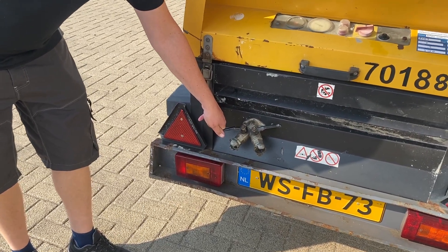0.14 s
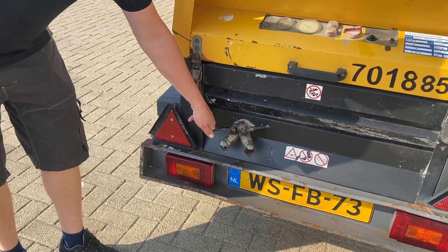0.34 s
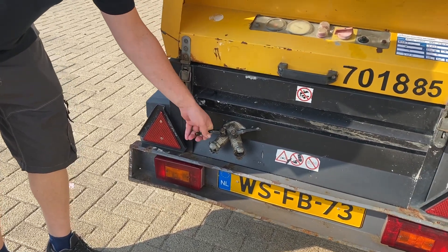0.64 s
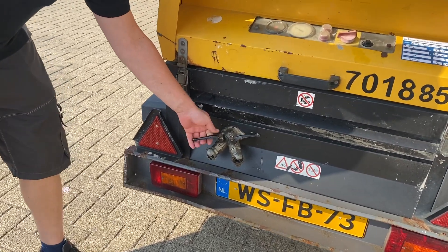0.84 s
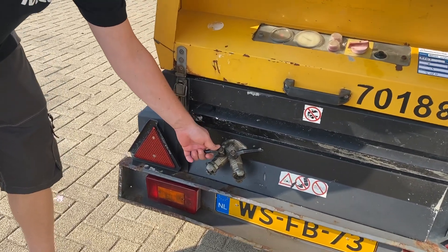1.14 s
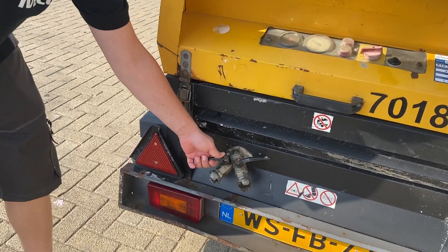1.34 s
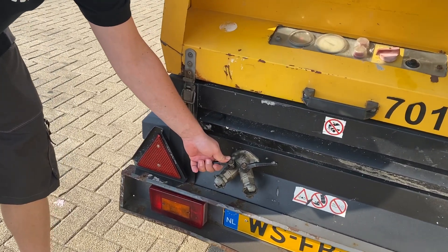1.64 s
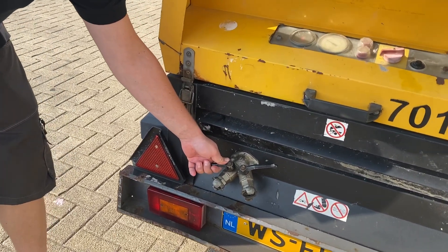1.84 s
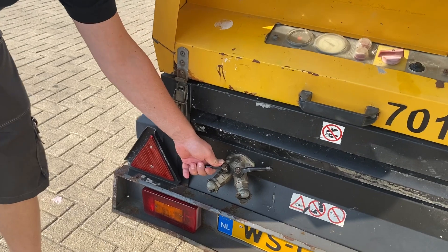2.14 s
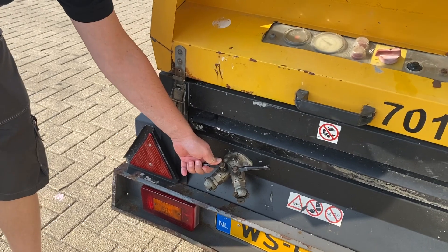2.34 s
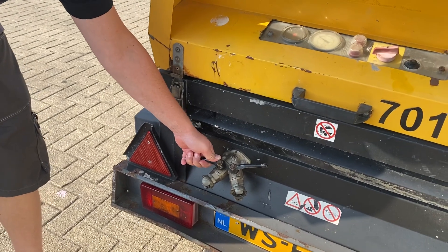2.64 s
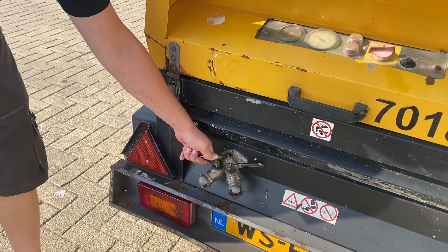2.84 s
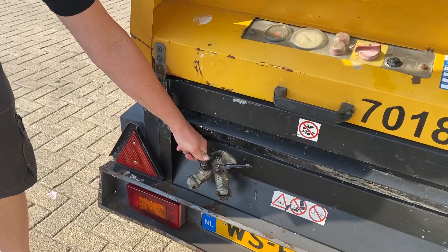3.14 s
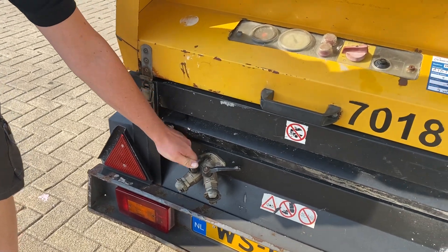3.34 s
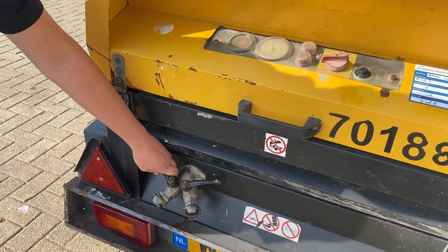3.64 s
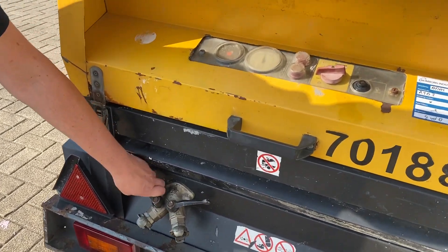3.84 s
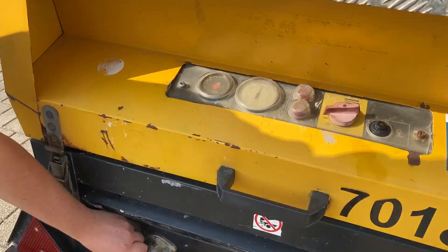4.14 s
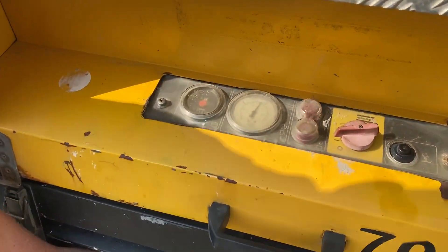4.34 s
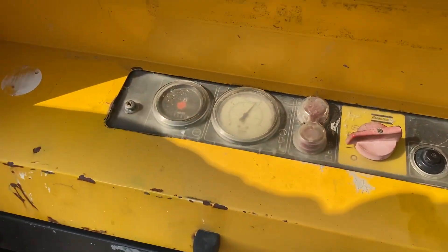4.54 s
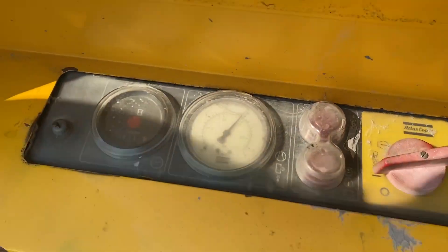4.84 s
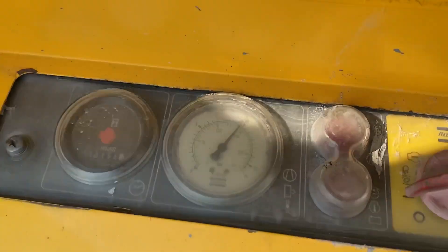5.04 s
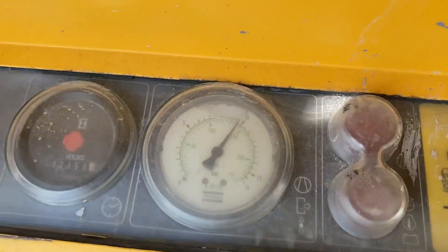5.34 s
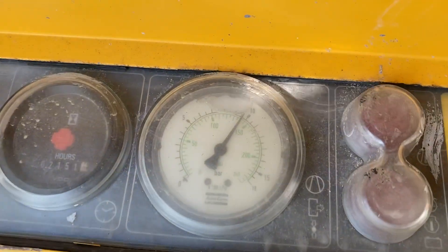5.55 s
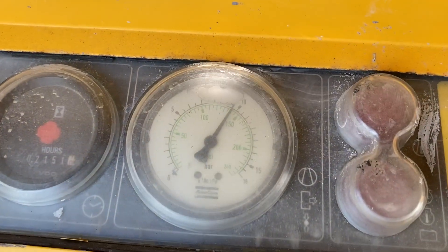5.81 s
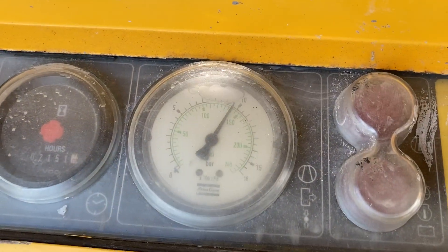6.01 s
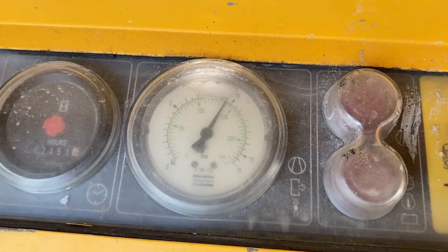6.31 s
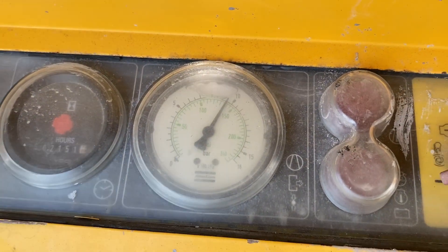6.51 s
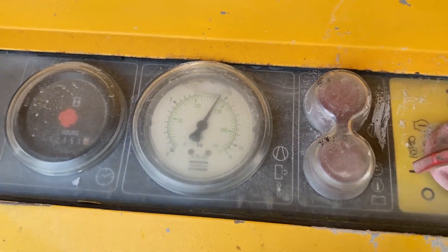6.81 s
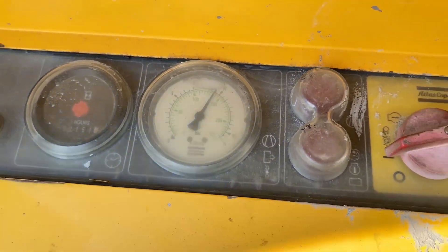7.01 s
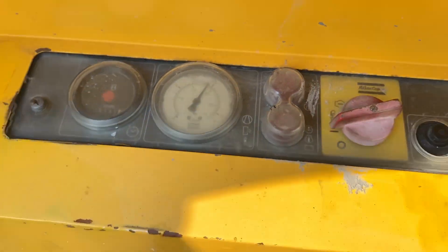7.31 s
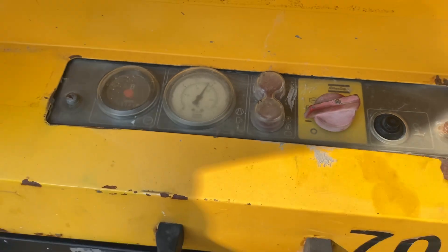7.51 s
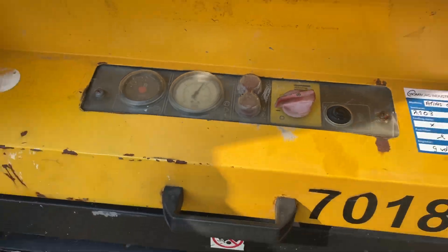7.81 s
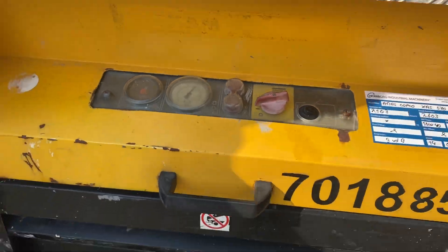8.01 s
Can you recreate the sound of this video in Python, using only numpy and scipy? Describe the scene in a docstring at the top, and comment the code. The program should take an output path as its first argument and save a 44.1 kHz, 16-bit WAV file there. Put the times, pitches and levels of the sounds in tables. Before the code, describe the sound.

Compressed air rushes from the outlet valve of a towed compressor with a loud, bright, steady hiss that nearly hides the engine. After about three seconds the valve closes, and the hiss thins and stops with a brief whistle. The diesel engine swells up, then slows to a throbbing idle with rumble, light clatter and a faint whine. It is heard close up in an outdoor yard, easing slightly near the end.

```python
"""Compressor valve shut-off

Air rushes from the outlet valve of a towed compressor until a hand shuts it, with a last whistle.
The recorder's gain holds the steady four-cylinder diesel down under the jet, then recovers.
The engine drops from working speed to idle: exhaust throb, rumble and clatter at each firing, upper
tones, screw rotor whine. Two close microphone ports hear it in a yard, backing away near the end."""
import sys
import numpy as np
from scipy import signal
from scipy.fft import rfft, irfft, next_fast_len
from scipy.io import wavfile
from scipy.ndimage import uniform_filter1d

SR = 44100
rng = np.random.default_rng(int(sys.argv[2]) if len(sys.argv) > 2 else 0)


def transcribe(u):
    """Save the signal u as a 16-bit wav file named by the first command-line argument.

    u: samples, shape (n,) or (channels, n), limited to [-1, 1]; the rate is SR.
    q: integer samples, one column per channel.
    """
    v = np.clip(np.atleast_2d(u).T, -1, 1)
    q = np.round(v * 32767).astype(np.int16)
    wavfile.write(sys.argv[1], SR, q)


N = 360297
T = np.arange(N) / SR

# valve open, closing, snapped shut: t/s, level/dB
JET_LEVEL = [(0, -22.5), (1.0, -24), (1.4, -22), (2.63, -22.5), (3.04, -30), (3.075, -38), (3.11, -54),
             (3.17, -66)]
# nozzle hiss: f/Hz, level/dB
JET_SPECTRUM = [(60, -28), (250, -28), (500, -30.5), (1100, -25.5), (1700, -19), (2700, -23), (3300, -19),
                (3650, -9), (4000, -6), (4600, -7.5), (6200, -7.5), (7600, -9.5), (7950, -10), (8050, 3),
                (8700, -4), (9300, -6), (12500, -4.5), (15700, -10)]
# hiss brightens: t/s, tilt/(dB/oct), half length/s
BRIGHT_SWELLS = [(1.55, 0.12, 0.41)]
# outlet air columns: f/Hz, half width/Hz, share at first, open, nearly shut (negative cancels)
OUTLET_MODES = [(1675, 120, 0.27, 0.64, 2.5), (2340, 110, 0.21, 0.22, -0.1), (2800, 100, -0.5, -0.17, -3.3),
                (3114, 140, 0.88, .9, 0.1), (3306, 110, -.9, -.4, 0.3), (3620, 98, 0.31, -0.25, -0.8),
                (4055, 70, 0.84, 1.0, 1.34), (4314, 98, 0.59, 0.64, 0.68), (4470, 88, -1.3, -.4, -0.24),
                (4605, 119, 0.76, 0.397, 2.6), (4930, 90, -0.12, -0.26, -3.8), (5010, 94, 0.26, 0.53, 2.2),
                (5450, 89, 0.87, .2, 1.4), (5720, 62, -0.746, 0.0058, -0.5), (5930, 88.4, 0.2, 0.051, 1.8),
                (6070, 79, 0.36, 0.52, 0.5), (5860, 77.3, 0.02, -0.74, -3), (7045, 120, .9, -0.32, 0.5),
                (8390, 120, 0.22, .3, -0.5), (8660, 120, 0.44, 0.417, 1), (10100, 75, 0.73, 0.45, 2.04),
                (10960, 87, -0.04, 0.53, 0.8), (11100, 78, -1, .3, -1.4), (11950, 190, -0.097, .5, 0.5),
                (13140, 202, 0.55, .2, 0.9)]
# outlet rings harder: t/s, gain/dB, half length/s
RING_SWELLS = [(.9, 4.5, 0.2)]
# hiss bands sliding as the listener shifts: t/s, f/Hz, slide/(Hz/s), half length/s, half width/Hz, gain/dB
SLIDING_BANDS = [(.15, 3750, -100, .35, 90, 5), (.75, 4130, -350, .45, 80, 6), (1.5, 4270, -300, .5, 80, 5),
                 (1.2, 5200, -300, .25, 80, 8), (1.75, 5380, -250, .5, 60, 5), (.45, 5880, -100, .4, 70, 6),
                 (1.25, 6020, -300, .3, 60, 5), (1.5, 6700, -200, .25, 60, 6),
                 (2.3, 6100, -150, .35, 60, 5), (2.5, 4600, -120, .5, 90, 5), (.9, 6350, -300, .25, 60, 4),
                 (1.0, 8800, -500, .4, 120, 3), (1.1, 10300, -900, .3, 120, 4),
                 (1.0, 11200, -900, .3, 120, 4)]
# echoes off trailer, arm and paving as people shift: t/s, 3 x (delay/ms, share)
JET_ECHOES = [(0, 2.55, 0.13, 0.77, 0.086, 2.3, 0.12), (.7, 1.9, 0.23, 0.87, 0.11, 1.3, .1),
              (.95, 2.1, 0.14, 0.8, 0.12, 2.4, 0.18), (1.3, 1.44, .1, 1.2, 0.099, 2.1, 0.22),
              (1.7, 2.35, 0.085, 1.8, .2, 2.1, 0.3), (2.0, 2.22, 0.12, 2.1, .15, 2.1, .1),
              (2.6, 1.83, 0.16, 1.94, 0.18, 2.9, .15), (3.2, 3, .3, 2.2, 0.095, 2.5, 0.22)]
# jet, left-right likeness: f/Hz, coherence
JET_COHERENCE = [(900, 1), (1300, 0.93), (1700, 0.81), (2600, 0.71), (4200, 0.91), (5800, 0.79), (6800, 1),
                 (16000, 1)]
# jet, left minus right: f/Hz, level/dB
JET_BALANCE = [(900, -3), (1410, 1), (2400, -0.5), (4400, 3.5), (6820, 1.5), (8100, 0.5), (15000, 0)]

# working speed, sag, drop, idle: t/s, cycle rate/Hz
CYCLE_RATE = [(0, 22.391), (3.35, 22.391), (4.3, 21.99), (4.42, 21.8), (4.54, 20.86), (4.9, 15.89),
              (5.02, 15.23), (5.15, 14.79), (5.5, 14.59), (6.0, 14.55), (7.0, 14.54), (7.5, 14.46),
              (8.17, 14.52)]
# engine as heard; recorder's gain low under the jet, recovering; a lull while slowing: t/s, level/dB
HEARD_LEVEL = [(0, -22), (2.98, -20), (3.16, -14), (3.64, -3), (4.35, 0.5), (4.76, -5), (5.0, -4.5),
               (5.3, -1), (5.55, 0.5), (8.17, 0)]
# exhaust at working speed: order of the cycle, relative level/dB
WORK_ORDERS = [(1, -41.5), (2, -36.5), (3, 4), (4, 3), (5, -11), (6, -26), (7, -11.5), (8, -12), (9, -10),
               (10, -44), (11, -8.5), (12, -25), (13, -42), (14, -50), (15, -43), (16, -37.5), (17, -27.5),
               (18, -30), (19, -33), (20, -44), (21, -46), (22, -48.5), (23, -51.5), (24, -46.5), (25, -49),
               (26, -41.5), (27, -55), (28, -24), (29, -31), (30, -31)]
# exhaust at idle: order, relative level/dB
IDLE_ORDERS = [(1, -41.5), (2, -30.5), (3, -8.5), (4, 2.5), (5, -15.5), (6, -26), (7, -13), (8, -4.5),
               (9, -30.5), (10, -47), (11, -34.5), (12, -16), (13, -31), (14, -24), (15, -20.5),
               (16, -17.5), (17, -36.5), (18, -28.5), (19, -36), (20, -57), (21, -43.5), (22, -33.5),
               (23, -31.5), (24, -41), (25, -35.5), (26, -33.5), (27, -47), (28, -47.5), (29, -42),
               (30, -39)]
# exhaust pipe while slowing: f/Hz, half width/Hz, gain/dB
PIPE_MODES = [(58, 10, 4), (78, 8, -15), (100, 9, 13), (124, 9, 12), (143, 10, -10), (245, 20, 9)]
# uneven firing while slowing: t/s, exhaust gain/dB, half length/s
STUMBLES = [(4.585, -2.5, 0.019), (4.67, 4.5, 0.05), (4.8, 0, 0.046)]
# knock per cylinder: level/dB
KNOCK_DB = [-2, -8, -12, 0]
# thud per cylinder: level/dB
THUD_DB = [-1, -1, -14, 0]
# casing rap per cylinder: level/dB
RAP_DB = [-2, -5, -6, 1]
# casing rumble: f/Hz, level/dB
RUMBLE_SPECTRUM = [(30, 0.5), (60, 14), (130, 13), (250, 5.5), (400, -1.5), (620, -8.5), (750, -9.5),
                   (900, -10.5), (1300, -12), (2200, -17), (4000, -28), (7000, -39)]
# casing clatter: f/Hz, level/dB
CLATTER_SPECTRUM = [(600, -4.5), (1300, 15), (1600, 5), (2200, 9.5), (3400, 10.5), (3800, 4.5), (4400, 7.5),
                    (5500, 0.5), (7500, -0.5), (9000, -6), (11000, -5.5), (13000, -15.5), (15500, -15)]
# clatter stands out as the jet stops: t/s, gain/dB, half length/s
CLATTER_SWELLS = [(3.27, 5, 0.098)]
# casing noise, left-right likeness: f/Hz, coherence
ENGINE_COHERENCE = [(150, 1), (400, 0.79), (700, 0.24), (1300, 0.17), (2400, 0.49), (5500, 0.42),
                    (6800, .8), (8500, 1), (16000, 0.95)]
# upper engine tones, some from gears: order, working level/dB, idle level/dB
TONE_ORDERS = [(28.2, -18.5, -8.5), (29.5, -12.5, -14), (32.28, -25, -5), (33.1, -19.5, -7.5),
               (35.3, -22.5, -6), (36.6, -15.5, -16), (39.1, -26.5, -10), (39.8, -22.5, -9.5),
               (40.9, -17, -14), (43.3, -28, -15), (44.1, -16.5, -6), (48.4, -26.5, -24), (59.8, -12, -11),
               (76, -18, -28), (91, -43, -26.5), (113.6, -10.5, -34.5), (112, -17.5, -25),
               (118.6, -14.5, -25), (126.3, -17.5, -27)]
# gearbox resonances: f/Hz, half width/Hz, gain/dB
GEARBOX_MODES = [(510, 28, 22), (970, 22, 15), (1260, 45, 16), (1420, 45, 26), (2350, 170, 12)]
# rotor partials: working ratio, idle ratio, 2 x bandwidth/Hz, working/dB, idle/dB, slowing gain/dB
WHINE_PARTIALS = [(1, 1, 160, -3, -15, 3), (1.17, 1.175, 130, -24, 1, 0), (1.88, 1.9, 200, -20, -20, 12),
                  (1.96, 1.97, 120, -4, 1, -1), (2.0, 2.065, 130, 0, -1, 1), (2.82, 2.82, 160, -24, -8, 0),
                  (3, 2.95, 300, -14.5, -10, 4)]
# whine strays in pitch: t/s, change of order, half length/s
WHINE_BENDS = [(5.7, 2.5, .5), (7.3, -3.5, .25), (7.85, 5, .3)]
# whine swells and dips: t/s, gain/dB, half length/s
WHINE_SWELLS = [(3.22, 5, .12), (4.45, 1.5, .2), (4.68, 3.5, .15), (5.05, 5.5, .2), (5.7, 1.5, .35),
                (6.92, 3, .1), (7.2, 5, .25), (7.75, -6, .3)]
# casing resonances: f/Hz, level/dB, t60/s
CASING_MODES = [(620.4, -5, 0.065), (852, 0.5, .06), (1295, 3.5, .06), (2070, -3.5, .04), (2500, -5, .03),
                (2770, -2, .03), (3400, -11.5, .025), (4910, -9.5, 0.024), (6500, -11.5, .012),
                (7600, -14.5, .01), (11000, -26, .01)]
# drone above the throb: order, level/dB
DRONE_ORDERS = [(31, -73.5), (34, -68.5), (37, -79), (38, -75), (42, -83), (43, -75), (46, -67.5),
                (47, -71), (49, -77.5), (50, -81), (51, -79), (52, -83.5), (54, -80.5), (55, -72.5),
                (56, -72), (57, -74), (58, -86.5), (59, -81.5), (61, -74), (62, -83.5), (63, -78.5),
                (64, -80.5), (65, -82.5), (68, -74.5), (69, -75.5), (70, -78), (71, -85), (72, -79.5),
                (74, -79), (75, -75.5), (76, -88.5), (77, -84), (79, -76), (80, -79.5), (82, -84.5),
                (85, -82), (87, -79.5), (88, -78), (89, -84.5), (92, -79.5), (93, -85), (99, -87)]

# closing valve: t/s, f/Hz, level/dB, rise/s, t60/s
WHISTLES = [(2.99, 9560, -36, .08, .03), (3.066, 15000, -47, .012, .06), (2.95, 4450, -41, .125, .04),
            (3.069, 4250, -33, .007, .03), (3.13, 9500, -74, .06, .1), (3.11, 15050, -78, .05, .2)]
# corner below which left and right are alike: t/s, f/Hz
MONO_CORNER = [(0, 1000), (3.1, 1000), (3.4, 850), (4.4, 830), (5.0, 30), (8.17, 30)]
# right port's lead: f/Hz, phase/rad
PORT_LEAD = [(6900, 0), (7500, .7), (8100, 1.9), (9050, 3.14), (11000, 6.2), (11500, 6.7), (12300, 8.2),
             (13350, 9.42), (15100, 12.5), (16000, 12.57)]

# added to HEARD_LEVEL: working/dB, idle/dB, loss while backing away/(dB/s)
EXHAUST_MIX, RUMBLE_MIX, CLATTER_MIX = (-31.5, -25, 4.7), (-46, -47.5, 4.5), (-56, -66.5, 1.5)
TONE_MIX, WHINE_MIX = (-50.5, -54.5, 5.4), (-66.5, -74, 2)
RAP_MIX, DRONE_MIX = (-71.5, -66, 2.5), (-27.5, 0, 5.5)
WORK_HZ, IDLE_HZ, BACK_AWAY_S = 22.1, 14.7, 6.79


def gain_of(db):
    """Decibels to gain."""
    return np.exp(np.asarray(db) * (np.log(10) / 20))


def unit_rms(x):
    """Scales to rms 1."""
    return x / np.sqrt(np.mean(x ** 2) + 1e-20)


def at_hz(points, hz):
    """Interpolates a spectrum over log frequency."""
    f, value = np.transpose(points)
    return np.interp(np.log(hz + 1), np.log(f + 1), value)


def at_time(rows, t):
    """Interpolates each column of a time table."""
    times, *values = np.transpose(rows)
    return [np.interp(t, times, v) for v in values]


def bumps(rows, t):
    """Sum of Gaussian rises and dips."""
    return sum(height * np.exp(-((t - peak_s) / half_s) ** 2) for peak_s, height, half_s in rows)


def peak(hz, centre_hz, half_width_hz):
    """Resonance curve of height 1."""
    return 1 / (1 + ((hz - centre_hz) / half_width_hz) ** 2)


def drift(length_s, t=T):
    """Slow random curve, rms about 1."""
    step_s = .005
    knots = rng.standard_normal(int(N / SR / step_s) + 2)
    knots = unit_rms(uniform_filter1d(knots, max(1, round(length_s / step_s))))
    return np.interp(t / step_s, np.arange(len(knots)), knots)


def resonate(x, hz, width_hz):
    """Gliding resonance: shift down to 0 Hz, smooth, shift back."""
    carrier, pole = np.exp(2j * np.pi * np.cumsum(hz) / SR), np.exp(-np.pi * width_hz / SR)
    return 2 * (carrier * signal.lfilter([1 - pole], [1, -pole], x / carrier)).real


def noise(shape_db, coherence, patchy_db, size=512):
    """Stereo noise of rms 1, coloured by shape_db(hz, t) and random patches."""
    hop = size // 4
    hz, t = np.fft.rfftfreq(size, 1 / SR)[:, None], np.arange(N // hop + 2) * hop / SR
    a, b, c, d, patches = rng.standard_normal((len(t), len(hz), 5)).T
    patches = unit_rms(uniform_filter1d(uniform_filter1d(patches, size=5, axis=0), size=16, axis=1))
    same, left = np.clip(at_hz(coherence, hz), -1, 1), a + 1j * b
    spectra = np.array([left, same * left + np.sqrt(1 - same ** 2) * (c + 1j * d)])
    spectra *= gain_of(shape_db(hz, t) + patchy_db * patches)
    return unit_rms(signal.istft(spectra, nperseg=size, noverlap=size - hop)[1][:, :N])


def nozzle_db(hz, t):
    """Hiss spectrum: duller as the jet weakens, thinner as the gap narrows."""
    turn_s, narrow_s, settle_s = 2.606, .14, 1.4
    narrow = 1 - np.exp(-np.maximum(t - turn_s, 0) / narrow_s)
    early = np.clip(1 - (t / settle_s) ** 2, 0, 1)
    stretch = 1 - .03 * early * (hz < 7000)  # the pipe-bound part starts lower
    tilt_db_oct = np.maximum(.45 * (at_time(JET_LEVEL, t)[0] + 22), -6) + bumps(BRIGHT_SWELLS, t)
    hiss_db = at_hz(JET_SPECTRUM, hz / stretch) + tilt_db_oct * np.log2((hz + 500) / 6000)
    bass_cut_db = (18.5 * narrow + 5.5 * early) / (1 + (hz / 700) ** 4)
    treble_cut_db = 7 * narrow / (1 + (4865 / (hz + 1)) ** 8) * (hz < 7950)
    return hiss_db - bass_cut_db - treble_cut_db


def outlet_db(hz, t):
    """Air columns ring in the outlet, wander, and change strength as it closes."""
    opened, closing = np.clip((t - .65) / .7, 0, 1), np.clip((t - 2.44) / .84, 0, 1)
    ringing = 0
    for mode_hz, width_hz, first, wide, shut in OUTLET_MODES:
        centre_hz = mode_hz * (1 + .0031 * drift(.48, t))
        share = first + (wide - first) * opened + (shut - wide) * closing + .14 * drift(.41, t)
        ringing += share * peak(hz, centre_hz, width_hz)
    return (7 + bumps(RING_SWELLS, t)) * ringing


def paths_db(hz, t):
    """Sliding bands and echo combs on the way to each port; complex dB carries the phase."""
    bands_db = sum(bumps([(s, db, half_s)], t) * peak(hz, f + slide * (t - s), width_hz)
                   for s, f, slide, half_s, width_hz, db in SLIDING_BANDS)
    side = np.array([.5, -.5])[:, None, None]
    echo_offset_ms, left_lead_ms = .0605, .019
    phase_per_ms = 2j * np.pi * hz / 1000
    side_phase = phase_per_ms * side * (hz < 7000)
    paths = at_time(JET_ECHOES, t)
    echo = sum(share * np.exp(phase_per_ms * ms) for ms, share in zip(paths[::2], paths[1::2]))
    echo = echo * np.exp(side_phase * echo_offset_ms) / (1 + (3000 / (hz + 1)) ** 4)
    comb_db = 20 * np.log10((1 + echo) * np.exp(side_phase * left_lead_ms))
    return bands_db + comb_db + side * at_hz(JET_BALANCE, hz)


def jet():
    """Turbulent air flutters through the nozzle until the valve shuts."""
    tail_db = 230 * np.maximum(T - JET_LEVEL[-1][0], 0)
    flutter_db = .43 * drift(.012) + .22 * drift(.1)
    hiss = noise(lambda hz, t: nozzle_db(hz, t) + outlet_db(hz, t) + paths_db(hz, t),
                 JET_COHERENCE, patchy_db=.877, size=1024)
    return gain_of(at_time(JET_LEVEL, T)[0] - tail_db + flutter_db) * hiss


def part_gain(mix, idle):
    """Gain of an engine part from the heard level, speed and distance."""
    work_db, idle_db, loss_db_s = mix
    distance_db = loss_db_s * np.maximum(T - BACK_AWAY_S, 0)
    return gain_of(at_time(HEARD_LEVEL, T)[0] + work_db + (idle_db - work_db) * idle - distance_db)


def exhaust(cycle_hz, turns, skew, idle, slowing):
    """Orders of the cycle throb, passing through the pipe modes as the speed drops."""
    tilt_db_oct = .19 * at_time(HEARD_LEVEL, T)[0]  # duller when faint
    orders, power = np.zeros(N), np.zeros(N)
    for (k, work_db), (_, idle_db) in zip(WORK_ORDERS, IDLE_ORDERS):
        pipe_db = sum(db * peak(k * cycle_hz, hz, width_hz) for hz, width_hz, db in PIPE_MODES)
        level_db = work_db + (idle_db - work_db) * idle + slowing * (pipe_db + 3 * drift(.05))
        size = gain_of(level_db + tilt_db_oct * np.log2(max(k / 4, 1)))
        power += size ** 2 / 2
        # the pipe holds upper orders back, odd ones more
        lag = .3 - idle / 2 + max(k - 8, 0) / 8 + idle * (k > 8) * (k % 2) / 4
        wander = .002 * k * drift(.3) + .05 * slowing * drift(.04)
        phase = k * turns + skew * (k - 3.5) - lag + wander
        orders += size * gain_of(.06 * k * drift(.15)) * np.cos(2 * np.pi * phase)
    mid = part_gain(EXHAUST_MIX, idle) * gain_of(bumps(STUMBLES, T)) * orders / np.sqrt(power)
    side = gain_of(-29) * idle * np.gradient(mid) * SR / (2 * np.pi * 60)  # pipe lies off centre
    return np.array([mid + side, mid - side])


def blows(firing):
    """Knock and thud envelopes: each cylinder fires with its own, slightly uneven force."""
    count = firing.astype(int)
    scatter_db = 1.2 * rng.standard_normal(count[-1] + 1)[count]
    blow_db = np.array([KNOCK_DB, THUD_DB])[:, count % 4] + scatter_db
    return uniform_filter1d(gain_of(blow_db) * np.exp(-(firing % 1)), size=60)


def rumble(thud, idle, slowing):
    """Low casing noise pulsed by each firing, boosted while slowing."""
    roar = noise(lambda hz, t: at_hz(RUMBLE_SPECTRUM, hz), ENGINE_COHERENCE, patchy_db=1.02, size=2048)
    pulse = unit_rms(1 + (.2 + 1.2 * idle) * thud)
    return part_gain(RUMBLE_MIX, idle) * gain_of(4 * slowing) * pulse * roar


def clatter(knock, idle):
    """Bright casing noise gated by each firing, most deeply at idle."""
    def shape_db(hz, t):
        working = (at_time(CYCLE_RATE, t)[0] - IDLE_HZ) / (WORK_HZ - IDLE_HZ)
        return at_hz(CLATTER_SPECTRUM, hz) + 1.5 * (hz > 9000) * working
    rattle = noise(shape_db, ENGINE_COHERENCE, patchy_db=1.3)
    pulse = unit_rms(1 + (.5 + 4.5 * idle) * knock)
    return part_gain(CLATTER_MIX, idle) * gain_of(bumps(CLATTER_SWELLS, T)) * pulse * rattle


def upper_tones(cycle_hz, turns, idle, slowing):
    """Upper engine tones, some from gears, follow the speed and flare at gearbox modes while slowing."""
    out = np.zeros((2, N))
    for k, work_db, idle_db in TONE_ORDERS:
        modes_db = sum(db * peak(k * cycle_hz, hz, width_hz) for hz, width_hz, db in GEARBOX_MODES
                       if .72 * k * WORK_HZ < hz < 1.05 * k * WORK_HZ)
        flicker_db = (3.5 - 1.4 * idle) * drift(.04)
        level_db = work_db + (idle_db - work_db) * idle + flicker_db + slowing * (modes_db - 5)
        phase = k * turns + (.22 - .19 * idle) * drift(.05) + rng.random((2, 1)) / 3
        out += gain_of(level_db) * np.cos(2 * np.pi * phase)
    return part_gain(TONE_MIX, idle) * out


def rotor_whine(cycle_hz, thud, idle, slowing):
    """Screw rotors: narrow noise bands that follow the speed and pulse at idle."""
    work_order, slowing_order, idle_order = 116, 112, 120
    settled = idle ** 30
    order = work_order + (slowing_order - work_order) * idle + (idle_order - slowing_order) * settled
    pitch_hz = cycle_hz * (order + bumps(WHINE_BENDS, T)) * (1 + .006 * idle * drift(.31))
    breath = rng.standard_normal((3, N))
    breath = breath[:2] + 2.1 * breath[2]  # mostly common to both sides
    out = np.zeros((2, N))
    for work_ratio, idle_ratio, span_hz, work_db, idle_db, slowing_db in WHINE_PARTIALS:
        ratio = work_ratio + (idle_ratio - work_ratio) * settled
        band = unit_rms(resonate(breath, ratio * pitch_hz, span_hz / 2))
        out += gain_of(work_db + (idle_db - work_db) * idle + slowing_db * slowing) * band
    pulse = unit_rms(1 + 1.5 * idle * thud)
    return part_gain(WHINE_MIX, idle) * gain_of(bumps(WHINE_SWELLS, T)) * pulse * out


def casing_raps(firing, idle):
    """Each firing raps the casing with three scattered taps; its modes ring."""
    scatter_s, scatter_db, attack_s = .002, 2.5, .0008
    count = firing.astype(int)
    onsets = np.flatnonzero(np.diff(count))
    chance = rng.standard_normal((len(onsets), 3, 2))
    places = onsets[:, None] + (scatter_s * SR * (1 + chance[..., 0])).astype(int)
    tap_db = np.array(RAP_DB)[count[onsets + 1] % 4][:, None] + scatter_db * chance[..., 1]
    taps = np.zeros(N)
    taps[np.clip(places, 0, N - 1)] = gain_of(tap_db)
    t, ring = np.arange(3000) / SR, 0
    for hz, db, t60_s in CASING_MODES:
        envelope = np.minimum(t / attack_s, 1) * gain_of(db - 60 * t / t60_s)
        ring += envelope * np.sin(2 * np.pi * hz * t + 2 * rng.random((2, 1)) * (hz < 6800))
    return part_gain(RAP_MIX, idle) * unit_rms(signal.oaconvolve(taps[None], ring)[:, :N])


def drone(turns, idle):
    """Upper orders repeat every cycle, strongest at idle; three sets waver independently."""
    cycle, out = np.linspace(0, 1, 2049), np.zeros((2, N))
    for first in range(3):
        k, db = np.transpose(DRONE_ORDERS[first::3])
        start = rng.random(len(k)) + rng.random((2, 1, len(k))) / 3
        phase = k * cycle[:, None] + start
        patterns = (np.sqrt(2) * gain_of(db) * np.cos(2 * np.pi * phase)).sum(-1)
        place = (turns + .0012 * drift(.1)) % 1
        out += gain_of(2.5 * drift(.12)) * np.array([np.interp(place, cycle, p) for p in patterns])
    return part_gain(DRONE_MIX, idle ** 4) * out


def engine():
    """One speed curve drives the diesel and the rotors."""
    cycle_hz, = at_time(CYCLE_RATE, T)
    turns = np.cumsum(cycle_hz) / SR
    idle = np.clip((WORK_HZ - cycle_hz) / (WORK_HZ - IDLE_HZ), 0, 1)
    slowing = np.clip(6 * idle * (1 - idle), 0, 1)
    skew = -.08 + .513 * idle  # lead of the strongest puff, in turns
    firing = 4 * (turns + skew - .02)
    throb = exhaust(cycle_hz, turns, skew, idle, slowing)
    knock, thud = blows(firing)
    return (throb + rumble(thud, idle, slowing) + clatter(knock, idle)
            + upper_tones(cycle_hz, turns, idle, slowing) + rotor_whine(cycle_hz, thud, idle, slowing)
            + casing_raps(firing, idle) + drone(turns, idle))


def whistles():
    """Narrow wavering tones from the valve's last slit."""
    out = np.zeros(N)
    for start_s, hz, db, rise_s, t60_s in WHISTLES:
        pitch_hz = np.full(N, hz)
        band = resonate(rng.standard_normal(N), pitch_hz, width_hz=68)
        tone = unit_rms(resonate(band, pitch_hz, width_hz=70))
        rise = np.sqrt(np.clip((T - start_s) / rise_s, 0, 1))
        out += gain_of(db - 60 * np.maximum(T - start_s - rise_s, 0) / t60_s) * rise * tone
    return out


def scene():
    """Valve air over the engine."""
    return jet() + whistles() + engine()


def record(dry):
    """Lows stay centred until the engine idles, then widen; the right port leads in the treble."""
    low_cut_hz, edge_hz = 36, 15750
    hz, t, side = signal.stft((dry[0] - dry[1]) / 2, SR, nperseg=1024)
    corner_hz, = at_time(MONO_CORNER, t)
    side = signal.istft(side / (1 + (corner_hz / (hz[:, None] + 1)) ** 16), SR, nperseg=1024)[1][:N]
    size = next_fast_len(N + 4096)
    spectrum = rfft(dry.mean(0) + np.array([side, -side]), size)
    hz = np.fft.rfftfreq(size, 1 / SR)
    spectrum /= np.sqrt(1 + (low_cut_hz / (hz + 1)) ** 10)  # small ports lose the deepest bass
    spectrum[1] *= np.exp(1j * at_hz(PORT_LEAD, hz))
    lowpass = signal.firwin(1535, edge_hz, window=("kaiser", 9), fs=SR)
    return signal.oaconvolve(irfft(spectrum, size)[:, :N], lowpass[None], "same")


dry = scene()
out = record(dry)
transcribe(out)
```